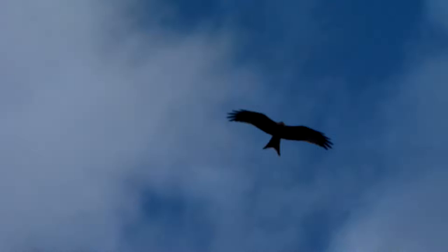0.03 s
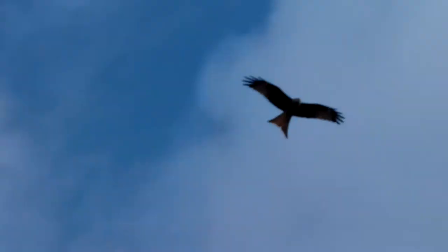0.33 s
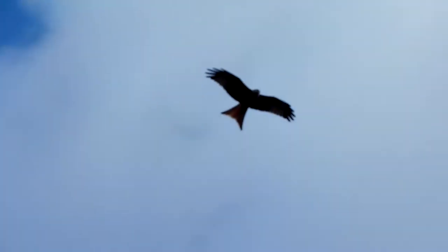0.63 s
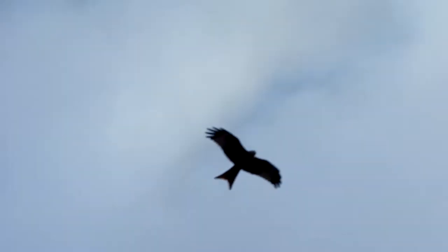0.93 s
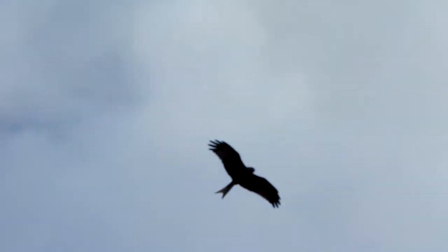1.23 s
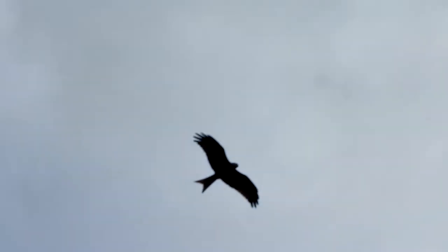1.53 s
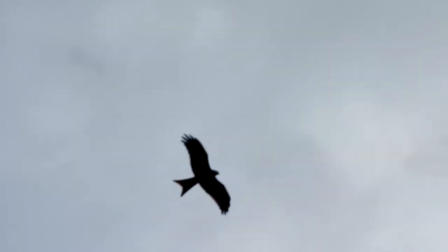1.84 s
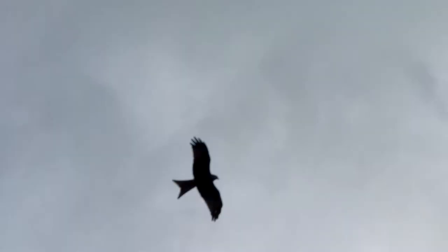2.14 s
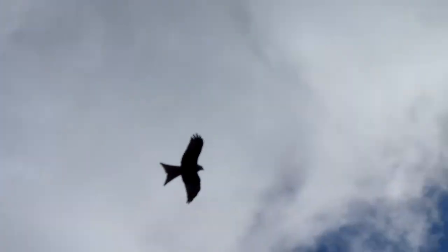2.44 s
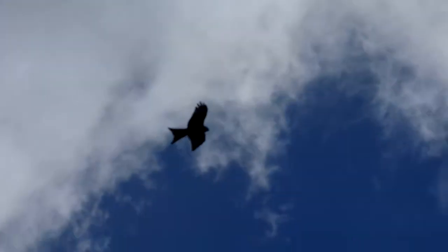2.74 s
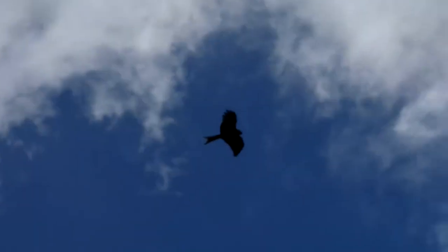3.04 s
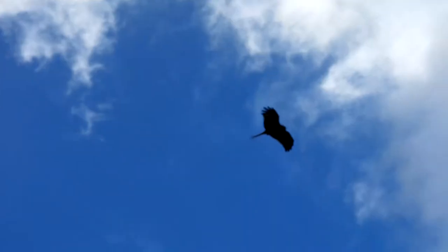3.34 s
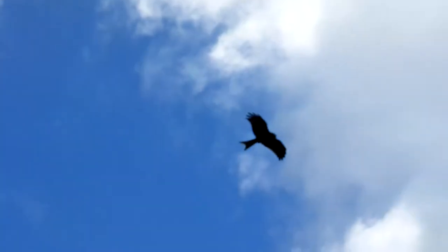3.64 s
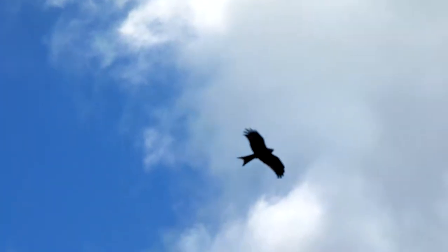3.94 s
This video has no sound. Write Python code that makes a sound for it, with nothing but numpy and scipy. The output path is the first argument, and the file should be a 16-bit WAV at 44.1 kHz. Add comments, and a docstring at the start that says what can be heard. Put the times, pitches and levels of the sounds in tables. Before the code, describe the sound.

Short, high bird chirps recur above steady hiss and wind on the microphone.

```python
"""Among trees, small birds chirp and whistle, their notes scattered by trunks and leaves.
Wind buffets the microphone over a soft outdoor rush, with a few faint ticks and rustles.
The camera adds its own hiss and thin whine. It starts with a click, soft bumps and a
faint falling buzz as its input settles, and fades the sound in."""
import sys
import numpy as np
from scipy import signal
from scipy.fft import rfft, irfft
from scipy.io import wavfile
from scipy.ndimage import uniform_filter1d

SR = 44100
rng = np.random.default_rng(int(sys.argv[2]) if len(sys.argv) > 2 else 0)


def dump_mix(stems):
    """Bounce the given channels to the path in sys.argv[1] as a 16-bit WAV at rate SR."""
    frames = np.atleast_2d(stems).T  # one column per channel
    limited = np.clip(frames, -1, 1)  # hard clip at full scale
    pcm = np.round(limited * 32767).astype(np.int16)
    wavfile.write(sys.argv[1], SR, pcm)


N = 176400

# Noise spectra. Each row: frequency in Hz, relative density in dB.
HISS_SPECTRUM = [(1500, -18), (2300, -8.5), (2850, -1.5), (3150, -4), (3600, 1.5), (4300, -2.5),
                 (5100, -2.5), (5800, 2.5), (6300, 4), (6750, -4.5), (7200, 5.5), (7650, -6), (8100, 3),
                 (8550, -6.5), (9000, 0.5), (9500, -15), (10500, -16), (15000, -17.5)]
AIR_SPECTRUM = [(76, 1), (130, 5.5), (161, 0), (204, 2), (276, -3), (309, 2.5), (337, -2.5), (392, -3),
                (715, -7), (1460, -19.5), (1680, -11.5), (1880, -16), (2600, -22), (3380, -83),
                (5720, -120)]
WIND_SPECTRUM = [(8, -3), (22, 3.5), (45, -5), (72, -8.5), (98, -18.5), (118, -29.5), (300, -53),
                 (900, -102)]
TICK_SPECTRUM = [(500, -16), (2000, -17), (3700, 3), (8000, 5), (11000, -20), (15000, -26)]
RUSTLE_SPECTRUM = [(200, -46), (500, 2.5), (780, 8.5), (1200, -10), (2200, -1), (6000, -43)]
# Camera fade-in. Each row: time in seconds, gain in dB.
FADE_IN_GAIN = [(.09, -70), (.12, -34), (.2, -22), (.33, -14), (.42, -10), (.47, -3), (.53, 0)]
# Steps of the settling input. Each row: start in seconds, step size in dB, edge time in seconds.
INPUT_STEPS = [(0.0939, -30.5, 0.0000079), (.176, -38, 0.0021), (0.252, -33.5, 0.0017), (0.339, -32, 0.002),
               (0.425, -30.5, 0.0029)]
# Buzz of the settling input. Each row: time in seconds, level in dB.
BUZZ_ENVELOPE = [(.1, -82), (.16, -65), (.4, -62.5), (.55, -90)]
# Wind on the microphone. Each row: time in seconds, relative level in dB.
GUST_ENVELOPE = [(.4, -48), (1.2, -45.5), (1.51, -45.5), (1.58, -36), (1.62, -43.5), (1.99, -44.5),
                 (2.05, -35.5), (2.1, -43), (2.7, -47), (2.775, -33), (2.83, -53), (2.89, -39), (3.1, -43),
                 (3.66, -44), (3.76, -37.5), (3.83, -34.5), (3.96, -29.5), (4, -31.5)]
# Dry ticks and dull rustles. Each row: start in seconds, level in dB.
TICK_EVENTS = [(1.016, -46), (3.039, -51), (3.065, -48.5)]
RUSTLE_EVENTS = [(1.093, -55), (2.793, -55)]
# Slurred whistles. Each row: start and length in seconds, start, middle and end pitch in Hz,
# level in dB, relative echo level in dB.
WHISTLE_NOTES = [(1.23, 0.083, 4970, 4920, 4954, -53, -7), (1.323, 0.062, 4280, 3410, 3050, -51.5, -5),
                 (1.420, 0.038, 3350, 3300, 2830, -62, -3), (1.501, 0.038, 5250, 5860, 5980, -52.5, -1),
                 (1.523, 0.059, 6075, 5220, 3830, -47.5, 0.5), (1.571, 0.055, 4460, 3290, 2160, -62, 8),
                 (1.668, 0.028, 5100, 5230, 5200, -54, -6), (1.704, 0.028, 3280, 3550, 3670, -54, -2.5),
                 (2.088, .070, 7250, 7370, 7260, -62.5, -20), (2.173, 0.078, 3800, 3763, 3860, -55.5, -11),
                 (2.232, 0.046, 7600, 7400, 6900, -64, -19), (2.380, 0.056, 7100, 6450, 5900, -61, -1),
                 (2.445, 0.0237, 3530, 4280, 4530, -51, -3.5), (2.505, 0.1, 2450, 2477, 2520, -64, -6),
                 (2.608, 0.1, 5110, 5360, 5430, -60, -8), (2.639, 0.0232, 3026, 2300, 1910, -56.5, 0),
                 (2.721, 0.0265, 3660, 4470, 4800, -54.5, -0.5), (2.756, 0.026, 7500, 6470, 5900, -56, 0),
                 (2.778, 0.039, 4780, 4620, 4620, -63.5, 1), (2.818, 0.029, 3480, 3150, 2570, -61.5, -1),
                 (3.021, 0.049, 5900, 6800, 6820, -52, -11), (3.036, 0.059, 6910, 6340, 6040, -50.5, -1),
                 (3.096, 0.039, 5700, 5645, 5700, -43, -8), (3.128, .034, 5580, 5480, 5300, -52.5, -5),
                 (3.753, .092, 7020, 6980, 7030, -60.5, -19), (3.754, 0.023, 3350, 3360, 3380, -59.5, -21),
                 (3.922, .082, 7250, 7300, 6940, -57, -16), (3.978, 0.031, 5510, 5760, 5600, -48, -6)]
# Raspy high notes ahead of the chirps. Each row: start and length in seconds,
# start, middle and end pitch in Hz, level in dB.
LEAD_IN_NOTES = [(0.422, 0.032, 4910, 4820, 4160, -51), (1.025, 0.044, 6300, 5610, 4900, -50),
                 (2.046, 0.05, 5240, 5780, 6360, -51.5), (2.571, 0.0297, 5160, 4700, 4320, -55.5),
                 (3.491, 0.04, 6010, 5700, 5680, -54)]
# Two-step chirps. Each row: drop time in seconds, upper, crest, lower and end pitch in Hz,
# upper and lower step length in seconds, overall gain in dB, lower step's relative gain in dB.
CHIRP_NOTES = [(0.473, 4014, 4030, 3186, 3060, 0.018, 0.032, -38.5, -8),
               (1.083, 4400, 4385, 3530, 3430, 0.018, 0.055, -35, -7.5),
               (2.119, 4350, 5010, 3408, 3690, 0.027, 0.069, -39, -6),
               (2.623, 3990, 4060, 3295, 2950, 0.02, 0.0373, -40, -11.5),
               (3.548, 4385, 4213, 3540, 3430, 0.023, .070, -37, -11.5)]

TIME_S = np.arange(N) / SR


def undb(db):
    """Decibels to gain."""
    return 10 ** (np.asarray(db) / 20)


def envelope(rows):
    """Gain along straight lines through (s, dB) rows."""
    return undb(np.interp(TIME_S, *np.array(rows).T))


def noise(gain):
    """Unit noise with amplitude spectrum gain(Hz)."""
    hz = np.arange(N // 2 + 1) * SR / N + 1e-9
    x = irfft(rfft(rng.standard_normal(N)) * gain(hz), N)
    return x / x.std()


def coloured(spectrum):
    """Unit noise through (Hz, dB) rows, falling away past both ends."""
    hz, db = np.array(spectrum, float).T

    def gain(f):
        skirts = np.minimum(1, np.minimum(f / hz[0], hz[-1] / f)) ** 4
        return undb(np.interp(np.log(f), np.log(hz), db)) * skirts
    return noise(gain)


def wander(rate_hz):
    """Slow unit noise, up to about the given rate."""
    return noise(lambda f: np.exp(-.5 * (f / rate_hz) ** 2))


def burst(start_s, decay_s):
    """Sudden onset, exponential decay."""
    age_s = TIME_S - start_s
    return (age_s >= 0) * np.exp(-np.abs(age_s) / decay_s)


def camera_hiss(hiss_db=-58.5, whine_db=-82, whine_hz=14400, half_width_hz=35):
    """Steady hiss coloured by the camera body, with a thin high whine."""
    whine = noise(lambda f: 1 / (1 + ((f - whine_hz) / half_width_hz) ** 2))
    return coloured(HISS_SPECTRUM) * undb(hiss_db) + whine * undb(whine_db)


def settling_buzz(start_hz=290, floor_hz=143, sag_s=.06):
    """Tiny regular steps, quickly slowing, as the camera's input settles."""
    age_s = np.maximum(TIME_S - BUZZ_ENVELOPE[0][0], 0)
    hz = floor_hz + (start_hz - floor_hz) * np.exp(-age_s / sag_s)
    phase = 2 * np.pi * np.cumsum(hz) / SR
    saw = sum(np.sin(k * phase) / k for k in range(1, 40))
    on = (age_s > 0) & (TIME_S < BUZZ_ENVELOPE[-1][0])
    return saw * envelope(BUZZ_ENVELOPE) * on


def start_clicks(settle_s=.021, offset_gain_db=-23.5, rise_s=.08, fall_s=.8):
    """One sharp step and a few soft bumps as the input's offset swells and settles."""
    first_s = INPUT_STEPS[0][0]
    offset = undb(offset_gain_db) * (burst(first_s, fall_s) - burst(first_s, rise_s))
    steps = sum(undb(db) * (burst(s, edge_s) - burst(s, settle_s)) for s, db, edge_s in INPUT_STEPS)
    return offset + steps


def distant_air(level_db=-56.5, drift_db=1.05):
    """Soft outdoor rush, drifting slightly in level."""
    return coloured(AIR_SPECTRUM) * undb(level_db + drift_db * wander(2.3))


def wind(rumble_gain_db=2, edge_gain_db=-11, edge_hz=84):
    """Gusts rumble on the microphone; strong ones reach higher in pitch."""
    force = envelope(GUST_ENVELOPE)
    edge = noise(lambda f: np.exp(-4 * (f / edge_hz - 1) ** 2))
    edge *= force ** 2 / force.max() * undb(edge_gain_db)
    return coloured(WIND_SPECTRUM) * force * undb(rumble_gain_db) + edge


def ticks():
    """Faint dry ticks close by: very short bright noise bursts."""
    level = sum(undb(db) * burst(s, decay_s=.006) for s, db in TICK_EVENTS)
    return level * coloured(TICK_SPECTRUM)


def rustles():
    """Dull rustles close by: noise bursts with softened onsets."""
    level = sum(undb(db) * burst(s, decay_s=.046) for s, db in RUSTLE_EVENTS)
    return uniform_filter1d(level, size=400) * coloured(RUSTLE_SPECTRUM)


def trees(sound, delay_s=.005, early_t60_s=.27, late_t60_s=.44, late_db=-23):
    """Trunks and leaves scatter sound: a short dense echo and a faint longer one."""
    age_s = np.arange(SR) / SR
    decay = undb(-60 * age_s / early_t60_s) + undb(late_db - 60 * age_s / late_t60_s)
    reflections = rng.standard_normal(SR) * (rng.random(SR) < .03)
    response = reflections * decay * (age_s > delay_s)
    return signal.fftconvolve(sound, response / np.linalg.norm(response))[:N]


def syrinx(hz, rms, waver_depth=.0036, octave_db=-30.5):
    """A bird's voice: a near-pure tone with a slight waver and a weak octave."""
    waver = waver_depth * rng.standard_normal() * np.sin(np.linspace(0, 4 * np.pi, len(hz)))
    phase = 2 * np.pi * np.cumsum(hz * (1 + waver)) / SR
    return np.sqrt(2) * rms * (np.sin(phase) + undb(octave_db) * np.sin(2 * phase))


def slur(start_s, length_s, first_hz, middle_hz, last_hz, db, rasp, attack_s=.01, fade_s=.014):
    """One note gliding along an arc through three pitches, roughened by pitch jitter."""
    age_s, out = TIME_S - start_s, np.zeros(N)
    on = (age_s >= 0) & (age_s < length_s)
    t = age_s[on]
    arc = np.polyfit([0, .5, 1], [first_hz, middle_hz, last_hz], 2)
    hz = np.polyval(arc, t / length_s) * (1 + rasp[on])
    attack = np.sin(np.pi / 2 * np.minimum(t / attack_s, 1))
    fade = np.sin(np.pi / 2 * np.minimum((length_s - t) / fade_s, 1))
    out[on] = syrinx(hz, attack * fade * undb(db))
    return out


def chirps(rise_s=.0071, drop_s=.0076, release_s=.016, warble_hz=41.8, warble_depth=.038):
    """Each chirp scoops up, holds, crests, then drops to a rough, warbling lower step."""
    upper_rasp, lower_rasp = .018, .051  # fractions of the pitch
    out, jitter = np.zeros(N), wander(280)
    for at_s, upper_hz, crest_hz, lower_hz, end_hz, hold_s, tail_s, db, lower_db in CHIRP_NOTES:
        onset_s, end_s = -hold_s - rise_s, tail_s + release_s  # relative to the drop
        age_s = TIME_S - at_s
        on = (age_s > onset_s) & (age_s < end_s)
        t = age_s[on]
        hz = np.interp(t, [onset_s, -hold_s, -hold_s / 2, -drop_s / 2, 0, drop_s, tail_s],
                       [lower_hz, upper_hz, upper_hz, crest_hz, upper_hz, lower_hz, end_hz])
        hz *= 1 - warble_depth * (t > 0) * np.sin(2 * np.pi * warble_hz * t)
        hz *= 1 + np.where(t > 0, lower_rasp, upper_rasp) * jitter[on]
        lower_gain = undb(lower_db)
        shape = np.interp(t, [onset_s, -hold_s, 0, drop_s, tail_s / 2, tail_s, end_s],
                          [0, .45, undb(-4.5), lower_gain, lower_gain, .5 * lower_gain, 0])
        out[on] += syrinx(hz, shape * undb(db))
    return out


def birds(chirp_echo_db=-1, lead_in_echo_db=-2.5, flutter_db=.98):
    """Chirps, their raspy lead-ins and the whistles, direct and through the trees."""
    lead_in_rasp = .064 * wander(630)
    whistle_rasp = .0085 * wander(240)
    flutter = undb(flutter_db * wander(49))
    calls = [(chirps(), chirp_echo_db)]
    calls += [(slur(*row, lead_in_rasp), lead_in_echo_db) for row in LEAD_IN_NOTES]
    calls += [(slur(*row, whistle_rasp), echo_db) for *row, echo_db in WHISTLE_NOTES]
    direct = sum(note for note, _ in calls)
    echo_send = sum(note * undb(echo_db) for note, echo_db in calls)
    return direct * flutter + trees(echo_send * flutter)


def scene():
    """Birds over wind and hiss, faded in as the camera settles; mono."""
    mix = birds() + ticks() + rustles() + wind() + distant_air() + camera_hiss()
    return (mix * envelope(FADE_IN_GAIN) + start_clicks() + settling_buzz())[None]


def record(dry):
    """The camera cuts the top treble steeply."""
    cutoff_hz = 15030
    return signal.sosfilt(signal.ellip(10, .2, 70, cutoff_hz, fs=SR, output="sos"), dry)


dry = scene()
out = record(dry)
dump_mix(out)
```